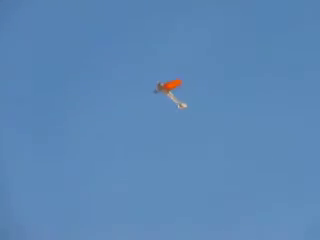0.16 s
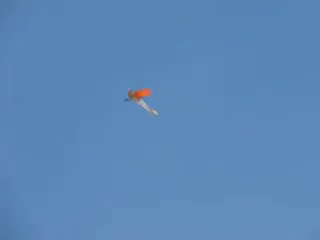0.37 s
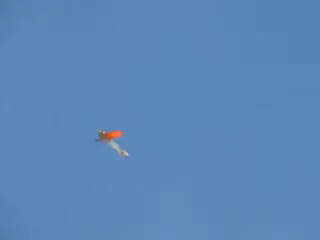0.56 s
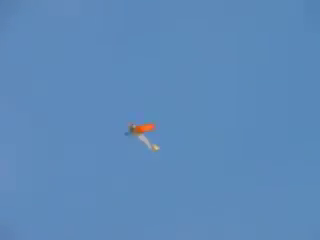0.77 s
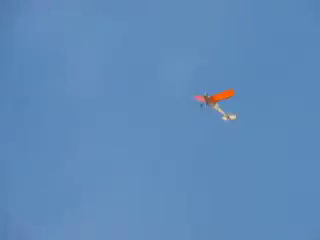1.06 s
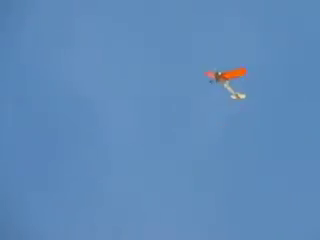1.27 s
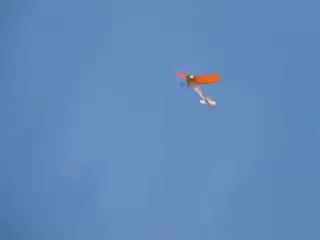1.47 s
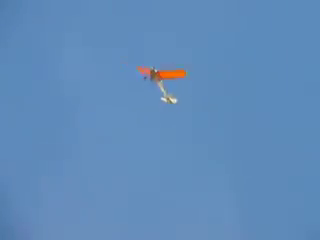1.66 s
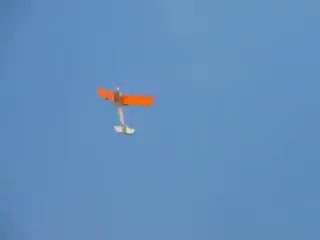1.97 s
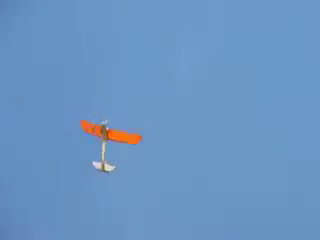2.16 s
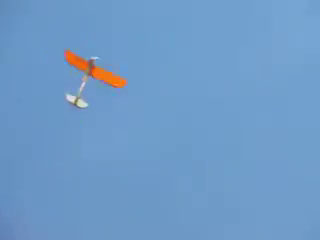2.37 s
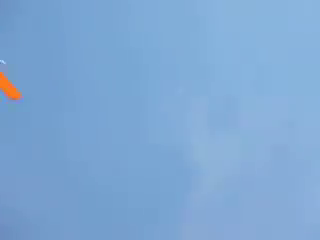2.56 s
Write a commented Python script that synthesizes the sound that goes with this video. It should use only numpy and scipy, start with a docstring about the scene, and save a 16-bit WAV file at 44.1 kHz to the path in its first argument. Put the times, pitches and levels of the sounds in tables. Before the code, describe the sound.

A small model airplane buzzes steadily in the open air. Low, rough wind gusts buffet the microphone, hardest in the first half, then ease as the buzz sweeps in tone and comes overhead.

```python
"""A small model airplane buzzes through a turn and comes overhead, outdoors.
Its motor fires a sharp pulse and a spit of air on every revolution. The ground returns the pulses
later and later as the plane nears, so the buzz sweeps like a flanger.
Over a low breeze, rough gusts and single puffs buffet the microphone, hardest in the first half."""
import sys
import numpy as np
from scipy import signal
from scipy.fft import rfft, irfft
from scipy.io import wavfile
from scipy.ndimage import map_coordinates

SR = 44100
rng = np.random.default_rng(int(sys.argv[2]) if len(sys.argv) > 2 else 0)


def wav_record(signal):
    """Record a signal, one row per channel, as 16-bit PCM in the file named by sys.argv[1]."""
    frames = np.transpose(np.atleast_2d(signal))
    bounded = np.clip(frames, -1, 1)
    # unit amplitude maps onto the largest positive 16-bit level
    quanta = np.round(bounded * 32767).astype(np.int16)
    wavfile.write(sys.argv[1], SR, quanta)


N = 119070
T, HZ = np.arange(N) / SR, np.fft.rfftfreq(N, 1 / SR)
HIGH_CUT_HZ = 8500


def amp(db):
    """Decibels to gain."""
    return 10 ** (np.asarray(db) / 20)


def unit_rms(x):
    """Scales to rms 1."""
    return x / np.sqrt(np.mean(x ** 2) + 1e-20)


def curve(rows, column=1):
    """One column of a time table, at every sample."""
    rows = np.array(rows)
    return np.interp(T, rows[:, 0], rows[:, column])


def eq_curve(points):
    """Gain of an EQ table at every frequency."""
    hz, db = np.transpose(points)
    return amp(np.interp(np.log(HZ + 1), np.log(hz), db))


def filtered(x, gain):
    """Applies one gain per frequency."""
    return irfft(rfft(x) * gain, N)


def noise(gain):
    """Noise of rms 1 with the given spectrum."""
    return unit_rms(filtered(rng.standard_normal(N), gain))


def drift(hz):
    """Random modulation that rolls off above the given rate."""
    return noise(np.exp(-(HZ / hz) ** 2))


def ring(x, gain):
    """Minimum-phase EQ: each pulse starts sharply and rings out."""
    cepstrum = irfft(np.log(gain), N)
    cepstrum[1:N // 2] *= 2
    cepstrum[N // 2 + 1:] = 0
    return filtered(x, np.exp(rfft(cepstrum)))


# Fader ride of the wind bed: time_s, level_db
BREEZE_LEVEL = [(0, -33.5), (.2, -33.5), (.7, -37.5), (.85, -39.5), (1.15, -39), (1.33, -40.5), (1.5, -45),
                (1.63, -37), (1.72, -42.5), (1.85, -41), (1.93, -34.5), (2.05, -34.5), (2.7, -34)]
# Its bass-heavy EQ: freq_hz, gain_db
BREEZE_EQ = [(20, -21), (50, 2), (100, 3.5), (200, 0), (400, -10.5), (800, -13.5), (1500, -24), (4000, -31),
             (8000, -45)]
def breeze(lump_db=3, lump_hz=45):
    """Light wind on the microphone: a lumpy bed of rumble."""
    rumble = noise(eq_curve(BREEZE_EQ)) * amp(lump_db * drift(lump_hz))
    return amp(curve(BREEZE_LEVEL)) * unit_rms(rumble)


# Wind hits on the microphone: start_s, length_s, level_db
GUST_HITS = [(0.113, 0.043, -25.5), (0.168, 0.075, -16), (0.249, 0.03, -21.5), (0.275, 0.028, -14),
             (0.298, 0.075, -21.5), (0.362, 0.0071, -18), (0.38, 0.073, -27.5), (0.408, 0.024, -14),
             (0.443, 0.064, -18.5), (0.517, 0.019, -12), (.55, 0.042, -26), (.598, 0.025, -17.5),
             (0.634, 0.034, -17.5), (0.679, 0.0098, -21.5), (0.763, 0.026, -22), (0.824, 0.0039, -25.5),
             (0.862, 0.027, -21), (0.913, 0.035, -23.5), (0.933, 0.03, -19.5), (0.97, 0.047, -21.5),
             (1.024, 0.039, -21), (1.138, 0.086, -29.5), (1.207, 0.046, -21.5), (1.258, 0.049, -26.5),
             (1.288, 0.074, -34), (1.364, 0.065, -25), (1.778, 0.04, -30), (1.867, 0.045, -29.5),
             (2.054, 0.041, -32.5), (2.39, 0.029, -39)]
# Their boomy EQ: freq_hz, gain_db
GUST_EQ = [(20, -44.5), (50, -24), (100, -3.5), (190, 4.5), (300, -2.5), (430, -8.5), (600, -19),
           (900, -48.5), (1400, -40.5), (2500, -81.5), (6000, -75)]
def gusts(attack_s=.0022, release_s=.0036, lump_db=4.5, lump_hz=71.5, leveller_hz=35,
          tear_db=-7.5, tear_hz=540, tear_octaves=.44):
    """Abrupt bursts of low turbulence; the hardest lumps tear into a brighter flutter."""
    force = np.zeros(N)
    for start, length, db in GUST_HITS:
        attack = np.clip((T - start) / attack_s + .5, 0, 1)
        release = np.exp(-np.maximum(T - start - length, 0) / release_s)
        force = np.maximum(force, amp(db) * attack * release)
    churn = noise(eq_curve(GUST_EQ))
    lumps = amp(lump_db * drift(lump_hz))
    slow_power = filtered((churn * lumps) ** 2, np.exp(-(HZ / leveller_hz) ** 2))
    body = force * churn * lumps / np.sqrt(abs(slow_power))
    tear = noise(np.exp(-.5 * (np.log2((HZ + 1) / tear_hz) / tear_octaves) ** 2))
    return body + amp(tear_db) * (force * unit_rms(lumps)) ** 1.87 * tear


# Pops and thumps of single eddies: centre_s, level_db, pitch_hz, half_length_cycles
EDDIES = [(.212, -11, 600, 0.62), (.224, -13.5, 700, 0.41), (.232, -12.5, 825, 0.23),
          (0.362, -10.5, 455, 0.24), (.466, -16, 680, 0.54), (0.503, -7, 415, 0.3),
          (0.525, -16.5, 980, 1.4), (.636, -16.5, 605, 0.34), (0.684, -12.5, 416, 0.42),
          (0.765, -8.5, 353, 0.28), (.776, -9.5, 400, 0.27), (.788, -6.5, 290, 0.33),
          (.803, -24.5, 500, 0.36), (.819, -29.5, 700, 0.45), (0.862, -23.5, 330, 0.24),
          (.94, -10.5, 324, 0.5), (.957, -11.5, 420, 0.51), (1.016, -22.5, 463, .27),
          (1.105, -15.5, 228, 0.23), (1.176, -12.5, 272, 0.25), (1.189, -19, 420, 0.28),
          (1.22, -21.5, 607, 1.55), (1.277, -8.5, 250, 0.19), (1.288, -10, 118, 0.27),
          (1.328, -11.5, 124, 0.17), (1.462, -13, 220, 0.29), (1.581, -27, 172, .35),
          (1.764, -26.5, 178, .35), (1.797, -17, 270, 0.13), (1.807, -29.5, 220, 0.46),
          (1.924, -24.5, 237, 0.27), (1.987, -21, 260, 0.34), (2.032, -22, 130, 0.39),
          (2.223, -11.5, 252, 0.38), (2.261, -18.5, 96, 0.31), (2.384, -23, 107, 0.27),
          (2.409, -18, 99, 0.21), (2.64, -25, 134, 0.4)]
def puffs(phase_rad=1):
    """Each eddy is a quick swing of pressure, or a short flutter."""
    out = np.zeros(N)
    for centre, db, hz, half_length in EDDIES:
        cycles = (T - centre) * hz
        near = abs(cycles) < 10
        envelope = np.exp(-(cycles[near] / half_length) ** 2 / 2)
        out[near] += amp(db) * envelope * np.cos(2 * np.pi * cycles[near] + phase_rad)
    return out


def crackle(centre_s=.524, half_length_s=.006, level_db=-58):
    """A short bright spit on top of the hardest gust."""
    envelope = np.exp(-((T - centre_s) / half_length_s) ** 2)
    return amp(level_db) * envelope * noise(HZ < HIGH_CUT_HZ)


def field_reverb(x, wet_db=-11, t60_s=.05):
    """The open field returns a short, faint tail of dense reflections."""
    tail = rng.standard_normal(N) * np.exp(-np.log(1000) * T / t60_s)
    return amp(wet_db) * signal.fftconvolve(x, tail / np.linalg.norm(tail))[:N]


# Flanger sweep, the lag of the ground echo: time_s, delay_ms
ECHO_DELAY = [(.4, .12), (.7, .38), (.88, .61), (1.2, 1.01), (1.4, 1.37), (1.75, 2.08), (1.9, 2.28),
              (2.0, 2.5), (2.25, 2.84), (2.4, 2.9), (2.7, 3.13)]
# Flanger depth, the echo against the direct sound: time_s, gain
ECHO_GAIN = [(.6, 0), (.88, .68), (1.25, .62), (1.85, .45), (2.7, .48)]
def ground_flange(direct, lowpass_hz=5200):
    """The ground adds a late, duller copy, which combs the buzz."""
    gain = curve(ECHO_GAIN)
    dull = filtered(direct, 1 / (1 + (HZ / lowpass_hz) ** 4))
    echo = map_coordinates(dull, [(T - curve(ECHO_DELAY) / 1000) * SR], mode="nearest")
    return (direct + gain * echo) / np.sqrt(1 + gain ** 2)


# Flutter from restless air, on harmonics near reference_hz: time_s, depth_ratio
FLUTTER_DEPTH = [(0, .4), (.25, .25), (1.1, .3), (1.5, .65), (2.7, .7)]
def firing(turns, pitch_hz, harmonics=75, flutter_hz=15, reference_hz=5000):
    """The motor's pulse train; each harmonic wavers on its own in the air, the high ones most."""
    depth, out = curve(FLUTTER_DEPTH), np.zeros(N)
    knots = np.arange(0, T[-1] + 1, 1 / flutter_hz)
    fundamental, harmonic = np.exp(2j * np.pi * turns), 1
    for k in range(1, harmonics + 1):
        harmonic = harmonic * fundamental
        chance = rng.standard_normal(len(knots)) + 1j * rng.standard_normal(len(knots))
        waver = np.interp(T + rng.random() / flutter_hz, knots, chance)
        share = depth * k * pitch_hz / reference_hz
        out += (harmonic * (1 + share * waver)).real / np.sqrt(1 + share ** 2)
    return unit_rms(out)


def smear(x, scatter_s=.0011, spacing_hz=420, bass_lag_s=.0077, bass_hz=1100):
    """Spreads each pulse into a short packet: its frequencies arrive apart, the lows last."""
    knots = np.arange(0, SR, spacing_hz)
    delay = scatter_s * np.interp(HZ, knots, rng.uniform(-1.113, 1, len(knots)))
    delay += bass_lag_s * np.maximum(1 - HZ / bass_hz, 0)
    return filtered(x, np.exp(-2j * np.pi * np.cumsum(delay) * SR / N))


# Motor pitch as heard, one pulse per revolution: time_s, pitch_hz
MOTOR_PITCH = [(0, 115.4), (.11, 114.8), (.28, 114.7), (.45, 113.8), (.62, 113.25), (.8, 113.3),
               (1.0, 113.95), (1.2, 114.8), (1.43, 116.45), (1.58, 116.8), (1.7, 116.8), (1.84, 117.2),
               (1.93, 116.6), (2.0, 116.5), (2.1, 115.5), (2.24, 115.05), (2.33, 113.95), (2.7, 112.8)]
# Fader ride of the hiss and rasp under the pulses: time_s, gain_db
AIR_GAIN = [(0, -15.5), (.7, -16), (1.45, -14), (1.85, -9), (2.2, -9), (2.45, -7), (2.7, -8.5)]
def motor(pitch_wander=.0004, wander_hz=27.2, level_shake=.038, shake_hz=69,
          hiss_db=-2, rasp_db=1, rasp_decay_turns=.22, bright_hz=1800):
    """The motor runs slightly unevenly: one pulse and one rasp of air per revolution, over hiss."""
    pitch = curve(MOTOR_PITCH) * (1 + pitch_wander * drift(wander_hz))
    turns = np.cumsum(pitch) / SR - .42  # starts part-way through a revolution
    rasp = unit_rms(np.exp(-(turns % 1) / rasp_decay_turns))
    air = noise(np.hypot(1, HZ / bright_hz) * (HZ < HIGH_CUT_HZ))
    air *= amp(hiss_db) + amp(rasp_db) * rasp
    pulses = firing(turns, MOTOR_PITCH[0][1]) * (1 + level_shake * drift(shake_hz))
    return smear(pulses + amp(curve(AIR_GAIN)) * air)


# Motor EQ heard from ahead, from the flank and from below: freq_hz, gain_db
AHEAD_EQ = [(115, 15.5), (230, 6.5), (690, 6), (920, 10), (1200, -7.5), (1370, 9.5), (1480, 1), (1820, 4.5),
            (1940, 2.5), (2170, 2), (2400, -4.5), (2740, -3), (2850, 2), (3190, -1), (3420, -7), (3650, 0),
            (3990, -8.5), (4110, -6), (4560, -8), (4680, -13.5), (6040, -11.5), (6500, -18), (6840, -17),
            (7070, -24.5), (8500, -41.5)]
FLANK_EQ = [(115, 3.5), (230, 8.5), (470, 11), (700, -3), (930, 8), (1400, -6.5), (1520, 3), (1980, 5),
            (2100, -1.5), (2680, -1.5), (2800, -0.5), (3260, 1.5), (3500, -1), (3730, -4.5), (3960, -5),
            (4200, -3), (5010, -17), (5130, -8.5), (5480, -15.5), (5830, -14), (6530, -19.5), (6760, -15),
            (7230, -22.5), (8500, -47.5)]
BELOW_EQ = [(115, -7), (340, 10), (460, 15.5), (680, 7), (800, 8.5), (910, 13.5), (1030, 1.5), (1480, 5.5),
            (1600, 1), (1820, -6), (1940, 0), (2050, -4), (2850, 3), (3080, -1), (3880, -1.5),
            (4100, -10.5), (4220, -6.5), (4330, -4), (4670, -18), (5470, -7.5), (5590, -9), (6160, -22),
            (6380, -10.5), (7070, -25), (8500, -37)]
# Crossfade between them: time_s, position (0 ahead, 1 flank, 2 below)
FACING = [(0, 0), (.95, 0), (1.35, 1), (1.95, 1), (2.2, 2)]
def angle_colour(x):
    """The tone shifts as the plane shows its nose, its flank, then its belly."""
    position, out = curve(FACING), np.zeros(N)
    for k, eq in enumerate([AHEAD_EQ, FLANK_EQ, BELOW_EQ]):
        fade = np.maximum(1 - abs(position - k), 0)
        out += fade * ring(x, eq_curve(eq))
    return out


# Drone below the first crossover: time_s, level_db
DRONE_LEVEL = [(0, -33.5), (.17, -38), (.3, -42.5), (.72, -41.5), (.85, -47.5), (1.5, -45.5), (1.8, -42.5),
               (2.2, -39), (2.45, -39), (2.7, -36.5)]
# Three bands of buzz above it: time_s, mid_db, upper_db, top_db
BUZZ_LEVELS = [(0, -41.5, -37, -47), (.06, -38, -47.5, -51), (.17, -33, -41.5, -50), (.21, -54.5, -51, -68),
               (.39, -49, -54.5, -58.5), (.5, -51.5, -46.5, -55), (.56, -54.5, -50.5, -59),
               (.66, -55.5, -48.5, -57), (.74, -50, -43.5, -49), (.78, -49.5, -46, -54),
               (.8, -56, -51, -60.5), (.92, -50, -52, -62), (1.04, -51.5, -56, -63),
               (1.19, -54, -49.5, -60.5), (1.4, -50.5, -46.5, -56), (1.55, -49, -48, -54),
               (1.83, -50, -45.5, -55.5), (1.96, -47.5, -41, -50), (2.07, -46, -46.5, -53.5),
               (2.35, -43, -45, -56), (2.7, -42.5, -42.5, -50.5)]
# Nasal edge, two narrow peaks on one fader: time_s, level_db
NASAL_LEVEL = [(0, -58), (.08, -56), (.165, -39), (.22, -65.5), (.56, -66), (.65, -48.5), (.765, -46),
               (.81, -65.5), (.9, -57), (1.1, -73)]
def airplane(crossovers_hz=(1290, 2590, 5250), nasal_hz=(2200, 2930), nasal_width_hz=150):
    """The flanged buzz; its bands swell and fade, with sharp dips drawn in where hard gusts hit."""
    buzz = ground_flange(angle_colour(motor()))
    lowpasses = [1 / (1 + (HZ / hz) ** 16) for hz in crossovers_hz] + [1]
    out = amp(curve(DRONE_LEVEL)) * unit_rms(filtered(buzz, lowpasses[0]))
    for k in range(1, len(lowpasses)):
        band = unit_rms(filtered(buzz, lowpasses[k] - lowpasses[k - 1]))
        out += amp(curve(BUZZ_LEVELS, column=k)) * band
    nasal_peaks = sum(np.exp(-((HZ - hz) / nasal_width_hz) ** 2 / 2) for hz in nasal_hz)
    out += amp(curve(NASAL_LEVEL)) * unit_rms(filtered(buzz, nasal_peaks))
    return out + field_reverb(out)


def scene():
    """Mono mix of the plane in the air and the wind at the microphone."""
    return (airplane() + gusts() + puffs() + crackle() + breeze())[None]


def record(dry):
    """Lopsided soft clipping on the hardest gusts, then a steep high cut."""
    ceiling = np.where(dry > 0, .31, .38)
    clipped = dry / (1 + (dry / ceiling) ** 6) ** (1 / 6)
    high_cut = signal.firwin(201, HIGH_CUT_HZ, window=("kaiser", 9), fs=SR)
    return signal.oaconvolve(clipped, high_cut[None], "same")


dry = scene()
out = record(dry)
wav_record(out)
```